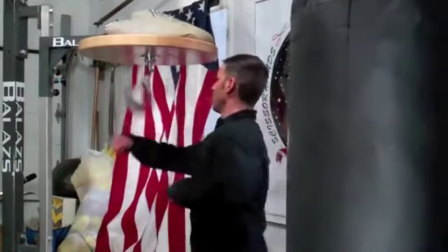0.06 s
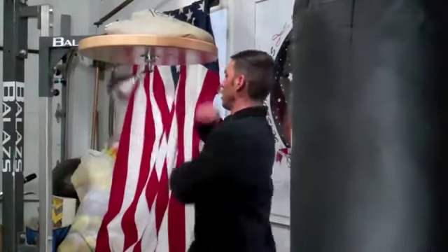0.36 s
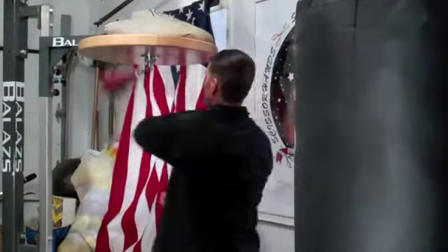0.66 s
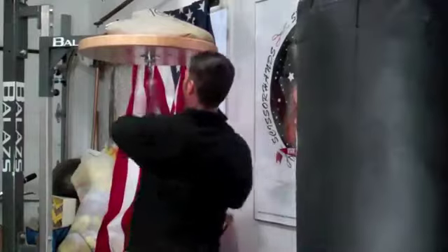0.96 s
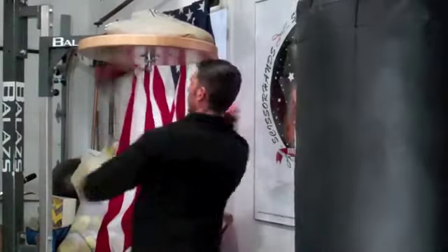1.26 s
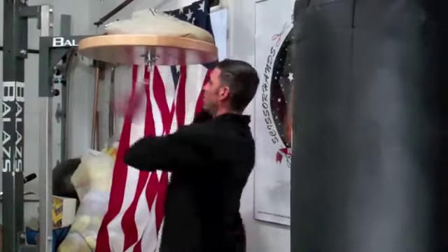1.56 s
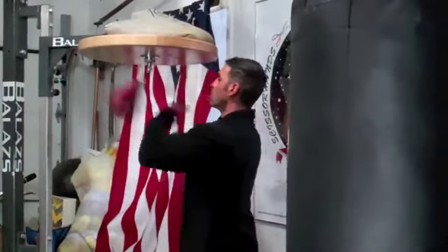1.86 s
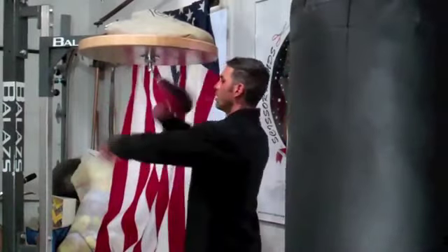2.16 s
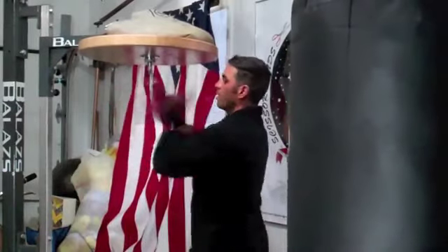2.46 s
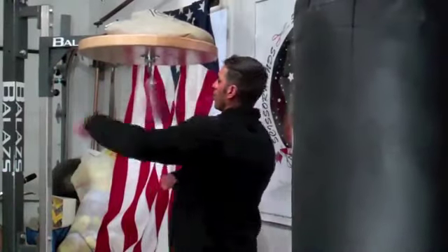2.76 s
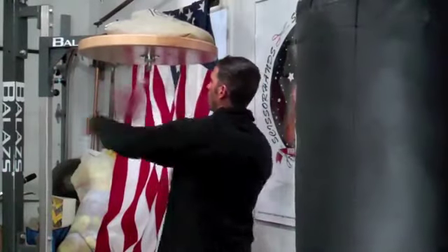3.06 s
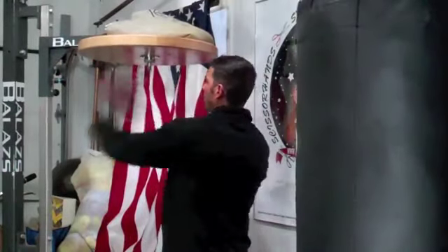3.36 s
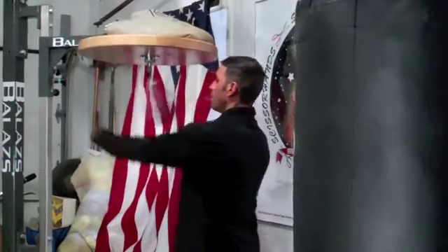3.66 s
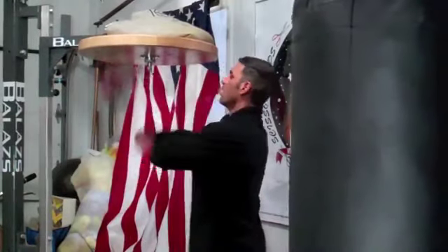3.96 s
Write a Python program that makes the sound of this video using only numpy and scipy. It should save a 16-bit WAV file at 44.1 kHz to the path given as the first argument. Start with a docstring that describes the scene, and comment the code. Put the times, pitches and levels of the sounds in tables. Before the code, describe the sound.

A speed bag is punched in a fast, dense run, each hit slapping leather and thumping a rattling wooden platform. The metal swivel clicks and squeaks in a hard-walled gym. The sound cuts out briefly, then the punching continues.

```python
"""A speed bag is punched against its round wooden platform in a hard-walled gym. From the first blow, each
punch or rebound thumps the board, slaps the leather and sets the platform rattling; the metal swivel clicks and
squeaks, the bracket clanks now and then, and the room smears it all. About a second in, the sound drops out
briefly. The punching runs on, the big blows overloading the microphone, and just before the last one a deep
shudder runs through the stand."""
import sys
import numpy as np
from scipy import signal
from scipy.fft import rfft, irfft
from scipy.io import wavfile
from scipy.ndimage import uniform_filter1d

SR = 44100
rng = np.random.default_rng(int(sys.argv[2]) if len(sys.argv) > 2 else 0)


def master_out(mix):
    """Clip the mix to full scale and print it as 16-bit PCM to the path in sys.argv[1]."""
    frames = np.transpose(np.atleast_2d(mix))
    ceiling = np.clip(frames, -1, 1)
    pcm = np.round(ceiling * 32767).astype(np.int16)
    wavfile.write(sys.argv[1], SR, pcm)


N = 176400
T = np.arange(SR // 2) / SR  # the half second that each hit gets to ring out

# The fist punches the bag and the bag rebounds off the board.
# Each row: start in seconds, thump level in dB, slap level in dB.
HITS = [(0.0, -19, -4), (0.0473, -11.5, -11.5), (0.172, -13.5, -14), (0.221, -12, -10.5),
        (0.35, -27, -12.5), (0.464, -9.5, -1.5), (0.5005, -5.5, -0.5), (0.577, -14, -12),
        (0.692, -16, -9.5), (0.744, -4.5, -9.5), (0.7727, -2, -3), (0.856, -9, -8), (0.912, -7, -9),
        (0.9401, 0.5, -8.5), (1.105, -8.5, -8.5), (1.117, -1.5, -4), (1.164, -6, -8.5), (1.266, -17, -8.5),
        (1.334, -8, -4), (1.3677, -2.5, -8.5), (1.453, -7, -7.5), (1.500, -15, -4.5), (1.5294, 1, -6.5),
        (1.612, -8, -7.5), (1.667, -12, -4), (1.6919, 6, 0), (1.7566, -5, -5.5), (1.845, -8, -8),
        (1.941, -6.5, -6), (1.998, -9, -9), (2.040, -9, -5), (2.140, -13, -6.5), (2.180, -9, -18),
        (2.269, -7.5, -14), (2.3048, -2, -7.5), (2.4, -10.5, -6), (2.477, -2.5, -5.5), (2.508, 5.5, 2.5),
        (2.5718, -5.5, -4), (2.665, -7.5, -9), (2.7353, -1.5, -2.5), (2.8166, -5.5, -9), (2.8973, -0.5, -5),
        (2.983, -10, -6.5), (3.0505, -2, -1.5), (3.132, -8.5, -6), (3.2148, -0.5, -4.5), (3.301, -15, -5),
        (3.335, -7.5, -7), (3.3601, 4, 1.5), (3.431, -7.5, -9), (3.528, -12, -8), (3.599, -9, -9),
        (3.6338, 1, -2.5), (3.712, -7.5, -6), (3.7875, 0, -2), (3.872, -8.5, -5.5), (3.940, -8, -4.5),
        (3.9675, 4.5, 1)]


def board():
    """Each punch or rebound rings and knocks the platform a little differently; the walls answer."""
    # Ring of board, frame and bag. Each row: pitch in Hz, level in dB, 60 dB decay time in seconds.
    modes = [(123.1, -11, 0.66), (155.6, 1.5, 0.57), (186.4, -2.5, 0.64), (187, -2, 0.18),
             (227.7, -7.5, 0.35), (255.4, -1, 0.18), (280.1, -3, 0.4), (320, -12, 0.075), (431.4, 2, 0.2),
             (471.4, -15, 0.38), (566, -7, 0.23), (664, -9, 0.395), (744, -9, 0.99)]
    # Tight knock as the bag flattens on impact. Each row: pitch in Hz, level in dB, 60 dB decay time
    # in seconds, share from 0 to 1 by which it follows the slap rather than the thump.
    knock_modes = [(214.7, -1.5, 0.034, 0), (432.5, -14, 0.054, 0.7), (619.5, -15, 0.052, 0.15),
                   (781, -18.5, 0.046, 0.3)]
    # Near walls and ceiling throw the knock back. Each row: delay in seconds, level in dB.
    wall_echoes = [(0.0213, -5.5), (0.0384, -8.5), (0.056, -13.5), (0.066, -14)]
    ring_db, ring_rise_s, scatter_db, ring_detune = -19, 0.009, 1.5, 0.01484
    knock_db, knock_rise_s, knock_lag_s, knock_detune = 5, 0.0045, 0.00337, 0.022
    out = np.zeros((2, N))
    pan = amp(np.array([[1.25], [-1.25]]))  # a touch to the left
    for start, thump_db, slap_db in HITS:
        ring = knock = 0
        for hz, db, t60 in modes:
            strength, tuning, polarity = rng.standard_normal(3)
            gain = np.sign(polarity) * amp(db + scatter_db * strength)
            ring += gain * fade(ring_rise_s, t60) * tone(hz * (1 + ring_detune * tuning))
        add(out, start, amp(ring_db + thump_db) * ring * pan)
        for hz, db, t60, share in knock_modes:
            gain = amp(knock_db + db + thump_db + share * (slap_db - thump_db))
            pitch = hz * (1 + knock_detune * rng.standard_normal())
            knock += gain * fade(knock_rise_s, t60) * tone(pitch) * pan
        add(out, start + knock_lag_s, knock)
        for lag, db in wall_echoes:
            add(out, start + knock_lag_s + lag, amp(db) * knock)
    return out


def bag():
    """The dull thump and rattling leather slap of every hit, each with its wash in the room."""
    # Dark body of the thump. Each row: frequency in Hz, relative level in dB.
    thump_spectrum = [(25, -35.5), (75, -31), (110, -11.5), (170, -2.5), (255, -2), (340, -3), (450, -5),
                      (750, -6.5), (1300, -8.5), (3000, -19)]
    # Bright smack of the leather. Each row: frequency in Hz, relative level in dB.
    slap_spectrum = [(60, -16), (150, 6), (400, 1.5), (800, 1.5), (1400, -2.5), (2100, -1), (3200, 0),
                     (5000, -4.5), (8000, -7.5), (10200, -11), (11200, -6), (14000, -7.5)]
    out, thumps, slaps = np.zeros((2, N)), noise(thump_spectrum), noise(slap_spectrum)
    # A fast hit plus a slower bloom in the room.
    thump_shape = amp(-20) * fade(0.0019, t60_s=0.21) + amp(-17) * fade(0.017, t60_s=0.54)
    slap_shape = amp(-10) * fade(0.0026, t60_s=0.15) + amp(-11.5) * fade(0.017, t60_s=0.67)
    for start, thump_db, slap_db in HITS:
        add(out, start, amp(thump_db) * thump_shape * piece(thumps))
        add(out, start, amp(slap_db) * slap_shape * rattle() * clatter(piece(slaps)))
    return out


def swivel_clicks():
    """The joint scrapes and snaps taut: a sharp click, its echo off the board, and a faint room tail."""
    # The swivel's clicks. Each row: start in seconds, level in dB.
    clicks = [(0.0481, 7), (0.173, -12), (0.223, -2), (0.3526, -12), (0.4742, -11), (0.5013, 8),
              (0.5777, 5), (0.6927, -4.5), (0.7729, 6), (0.8569, -0.5), (0.9409, -1), (1.164, 0.5),
              (1.266, 0), (1.3342, -0.5), (1.3683, 1), (1.4538, -2.5), (1.53, 0), (1.6116, -6), (1.6666, 2),
              (1.6941, 6.5), (1.757, -1), (1.845, -8), (1.941, 1), (1.9975, -6), (2.0416, 7), (2.1417, -5),
              (2.1799, -3.5), (2.2138, -1), (2.3045, -4), (2.4, 5), (2.4772, -3), (2.509, 6), (2.6642, -3),
              (2.7353, 1), (2.816, -12), (2.866, -8), (2.8977, 4), (2.9831, -1), (3.05, 4), (3.1313, -6),
              (3.2152, 2), (3.3014, -6), (3.3603, 5), (3.431, 7), (3.5277, -2.5), (3.5991, -3),
              (3.6337, 10), (3.7127, -3.5), (3.7584, -3), (3.7878, 5), (3.8716, -5), (3.9393, -5),
              (3.9689, -9)]
    # Grit of the scrape. Each row: frequency in Hz, relative level in dB.
    grit_spectrum = [(200, -11), (1200, -6.5), (3000, -19), (5000, 6.5), (7500, 3.5), (10000, -2),
                     (12000, 1), (14000, 6)]
    # Ping of the steel. Each row: pitch in Hz, level in dB, 60 dB decay time in seconds.
    steel_modes = [(1200, -15.5, 0.0094), (2260, -13.5, 0.0059), (3850, 1.5, 0.0031), (5400, -0.5, 0.0036),
                   (7380, -1, 0.0021), (11360, 4, 0.002)]
    snap_db, snap_lag_s, snap_detune, echo_db, echo_lag_s = -5, 0.0008, 0.18, -13, 0.0042
    out, grit = np.zeros((2, N)), noise(grit_spectrum)
    scrape = amp(3) * fade(0.00045, t60_s=0.0035)
    room_tail = amp(-20.5) * fade(0.0032, t60_s=0.21)
    t = T[:SR // 20]
    for start, db in clicks:
        snap = 0
        for hz, mode_db, t60 in steel_modes:
            pitch = hz * (1 + snap_detune * rng.uniform(-1.2, 1, (2, 1)))
            decay = np.exp(-np.log(1000) * t / t60)
            snap += amp(snap_db + db + mode_db) * np.sin(2 * np.pi * pitch * t) * decay
        add(out, start, amp(db) * (scrape * piece(grit) + room_tail * clatter(piece(grit))))
        add(out, start + snap_lag_s, snap)
        add(out, start + snap_lag_s + echo_lag_s, amp(echo_db) * snap)
    return out


def swivel_squeaks():
    """Dry metal scratches in the joint and rings very high; the pitch sags as the swing slows."""
    # Each row: start in seconds, opening pitch in Hz, level in dB, 60 dB decay time in seconds.
    squeaks = [(0.109, 11500, -4, .2), (0.229, 13850, 8.5, 0.12), (0.365, 13840, 8, .08),
               (0.652, 11160, -2, 0.2), (1.365, 12800, -1, .14), (1.555, 11300, -6, .18),
               (1.786, 12400, 0, 0.22), (1.83, 12200, -2, .2), (1.895, 12500, -2, .15),
               (1.999, 12550, 8, 0.12), (2.030, 12030, 7, .15), (2.042, 11000, 0, .15),
               (2.355, 11160, -4, .1), (2.480, 13350, 7, .12), (2.64, 12140, -3, 0.4),
               (2.794, 11530, 2, .17)]
    squeak_db, ring_width_hz, scratch_db, scratch_width_hz, sag_hz_per_s = -17, 150, -14, 680, 4400
    out = np.zeros((2, N))
    f = np.fft.rfftfreq(len(T), 1 / SR)
    sag = np.exp(-1j * np.pi * sag_hz_per_s * T ** 2)
    for start, hz, db, t60 in squeaks:
        ring = 1 / (1 + ((f - hz) / ring_width_hz) ** 2)
        scratch = amp(scratch_db) / (1 + ((f - hz) / scratch_width_hz) ** 2)
        steady = irfft(rfft(rng.standard_normal((2, len(T)))) * (ring + scratch))
        squeak = (signal.hilbert(steady) * sag).real  # slides the whole band down
        add(out, start, amp(squeak_db + db) * squeak / squeak.std() * rattle() * fade(0.0037, t60))
    return out


def stand():
    """The platform's metal bracket clanks now and then; just before the last blow a deep shudder sets in."""
    # The bracket's clanks. Each row: start in seconds, level in dB.
    clanks = [(0.371, -1), (0.474, -2), (0.911, 2.5), (1.292, -4), (2.982, 3.5)]
    # Ring of the bracket. Each row: pitch in Hz, level in dB.
    bracket_modes = [(1416, -17), (2429, -18), (2790, -7.5), (3260, -8.5), (3315, 5)]
    # Low rumble of the stand. Each row: frequency in Hz, relative level in dB.
    shudder_spectrum = [(20, 0), (45, 3), (80, -5), (150, -29), (600, -58)]
    clank_db, shudder_db, shudder_start_s = -23, -15, 3.955
    out = np.zeros((2, N))
    for start, db in clanks:
        ring = sum(amp(mode_db) * np.sin(2 * np.pi * (hz * T + rng.random((2, 1))))
                   for hz, mode_db in bracket_modes)
        add(out, start, amp(clank_db + db) * ring * rattle() * fade(0.0026, t60_s=0.17))
    shudder = piece(noise(shudder_spectrum)) * fade(0.01, t60_s=0.37)
    add(out, shudder_start_s, amp(shudder_db) * shudder)
    return out


def rattle(steps_per_s=260, depth_db=1.5):
    """Loose fittings put an uneven flutter on the level."""
    step = int(SR / steps_per_s)
    gains = amp(depth_db * rng.standard_normal(len(T) // 10))
    return uniform_filter1d(gains[np.arange(len(T)) // step], step // 2)


def clatter(sound, depth_db=3.5, spacing_hz=70):
    """Dense, uneven resonances of wood and hardware colour the sound; it comes back at unit rms."""
    f = np.fft.rfftfreq(len(T), 1 / SR)
    knots = np.arange(len(f) // 2)
    peaks_db = depth_db * np.interp(f / spacing_hz, knots, rng.standard_normal(len(knots)))
    coloured = irfft(rfft(sound) * amp(peaks_db))
    return coloured / coloured.std()


def room_tone():
    """The steady, quiet wash of the gym."""
    # Each row: frequency in Hz, relative level in dB.
    gym_spectrum = [(25, -31), (65, -22), (85, -6), (160, -23), (400, -8.5), (1000, 0), (3000, -5.5),
                    (9000, -13.5), (12000, -7), (15000, -21.5)]
    return amp(-32.5) * noise(gym_spectrum)


def noise(spectrum):
    """Coloured stereo noise of unit rms: narrow in the low mids, wide in the treble."""
    # The stereo image. Each row: frequency in Hz, side minus mid in dB, left minus right in dB.
    image = [(30, 0, -7.5), (60, -10, 1), (120, -20.5, 2.5), (500, -16.5, 2.5), (1000, -14, 2.5),
             (2000, -5.5, 0.6), (4000, -0.5, 2.4), (12000, -1.5, 0.2)]
    log_f = np.log(np.maximum(np.fft.rfftfreq(N, 1 / SR), 1))

    def curve(table, column):
        rows = np.array(table)
        return amp(np.interp(log_f, np.log(rows[:, 0]), rows[:, column]))

    mid, side = np.exp(2j * np.pi * rng.random((2, len(log_f))))
    width, lean = curve(image, 1), np.sqrt(curve(image, 2))
    pair = np.array([(mid + width * side) * lean, (mid - width * side) / lean])
    coloured = irfft(pair * curve(spectrum, 1) / np.hypot(1, width), N)
    return coloured / coloured.std()


def piece(long_noise):
    """A random stretch of a long noise, one hit long."""
    i = rng.integers(N - len(T))
    return long_noise[:, i:i + len(T)]


def tone(hz):
    """A sine, one hit long."""
    return np.sin(2 * np.pi * hz * T)


def fade(rise_s, t60_s):
    """Quick swell, then a decay of 60 dB every t60_s."""
    return (1 - np.exp(-T / rise_s)) * np.exp(-np.log(1000) * T / t60_s)


def amp(db):
    """Decibels to gain."""
    return 10 ** (np.asarray(db) / 20)


def add(out, start_s, sound):
    """Mix a sound in at its time."""
    i = max(0, int(start_s * SR))
    n = max(0, min(sound.shape[-1], N - i))
    out[:, i:i + n] += sound[..., :n]


def scene():
    """Board, bag, stand and swivel over the room tone of the gym."""
    return board() + bag() + stand() + swivel_clicks() + swivel_squeaks() + room_tone()


def record(dry):
    """The microphone overloads on the peaks, the sound drops out once, and the very top is cut."""
    dropout_start_s, dropout_end_s, top_hz = 0.995, 1.110, 14250
    t = np.arange(N) / SR
    gate = uniform_filter1d(1. * ((t < dropout_start_s) | (t > dropout_end_s)), size=64)
    soft_clipped = dry / (1 + dry ** 6) ** (1 / 6)
    lowpass = signal.ellip(10, .2, 60, top_hz, fs=SR, output="sos")
    return signal.sosfilt(lowpass, soft_clipped * gate)


dry = scene()
out = record(dry)
master_out(out)
```